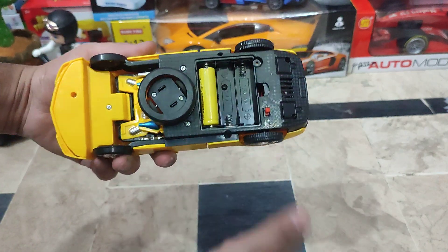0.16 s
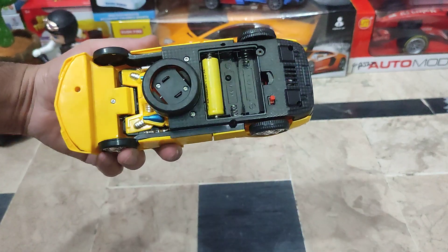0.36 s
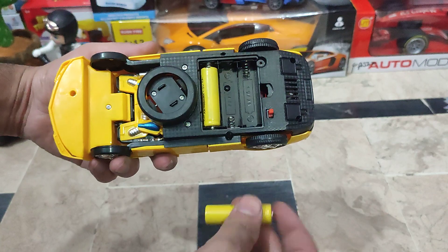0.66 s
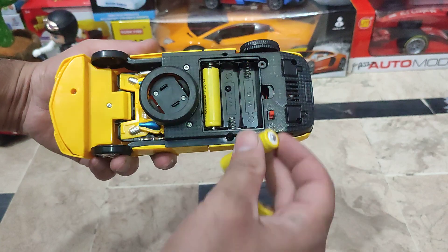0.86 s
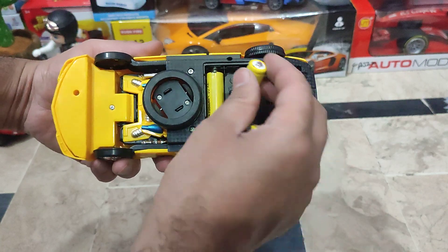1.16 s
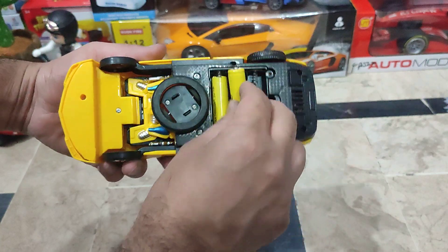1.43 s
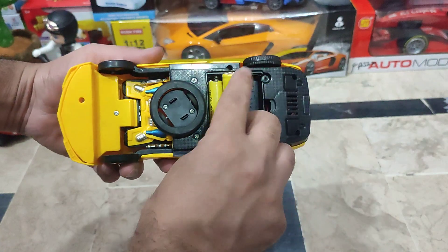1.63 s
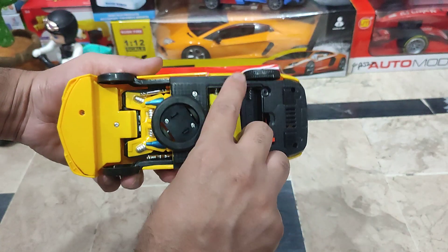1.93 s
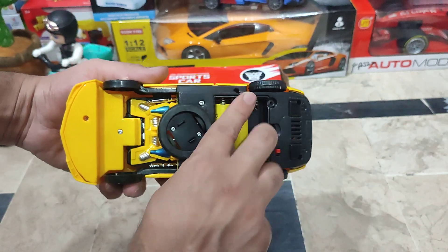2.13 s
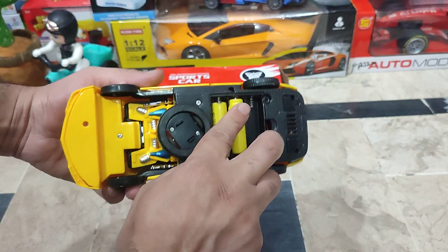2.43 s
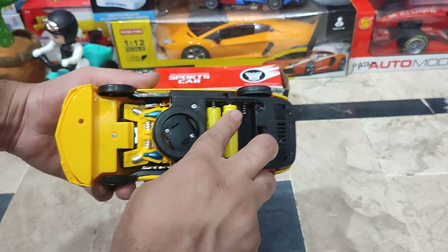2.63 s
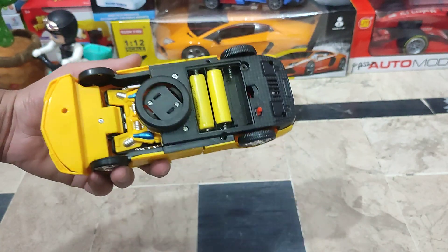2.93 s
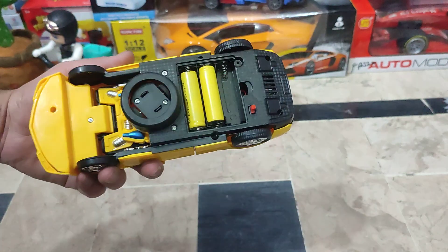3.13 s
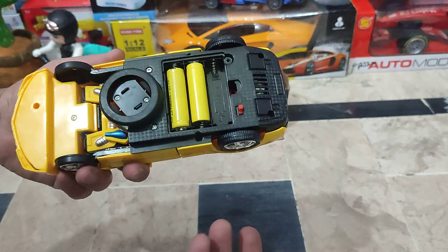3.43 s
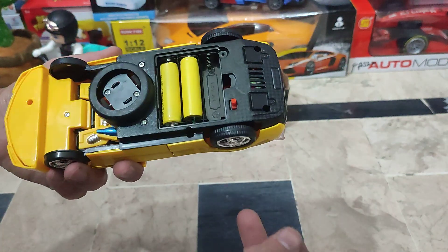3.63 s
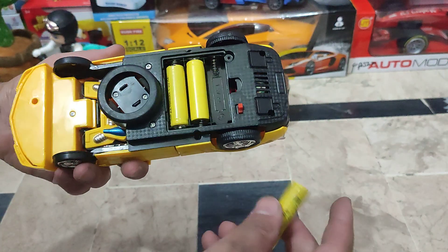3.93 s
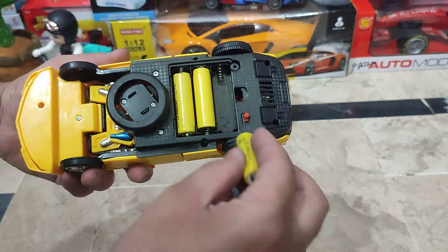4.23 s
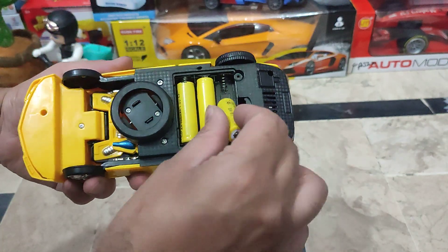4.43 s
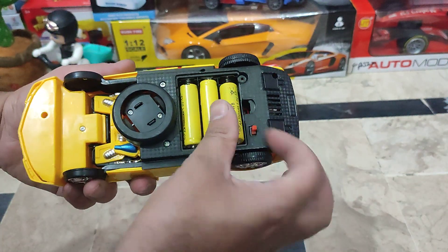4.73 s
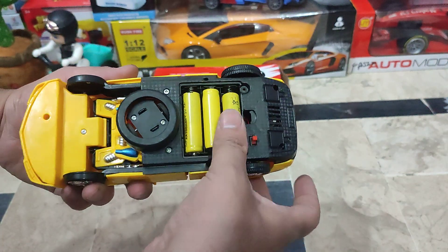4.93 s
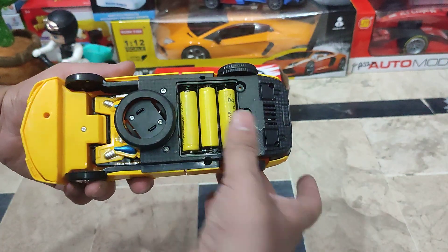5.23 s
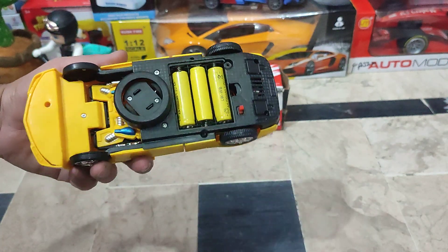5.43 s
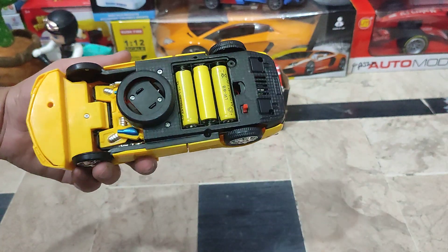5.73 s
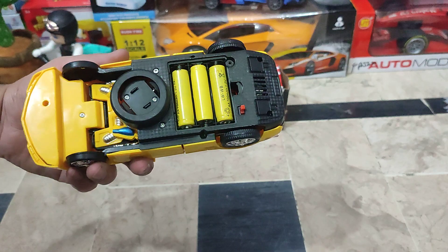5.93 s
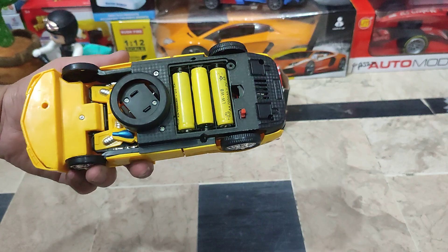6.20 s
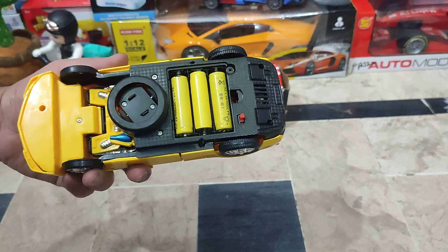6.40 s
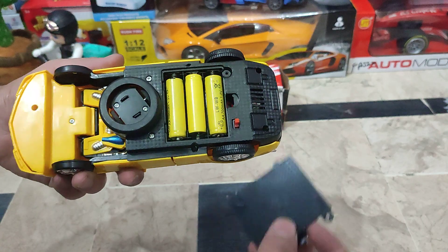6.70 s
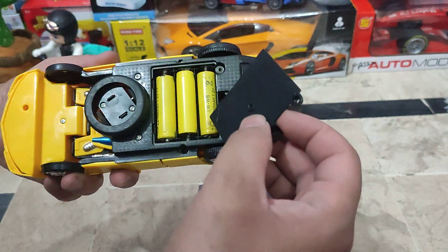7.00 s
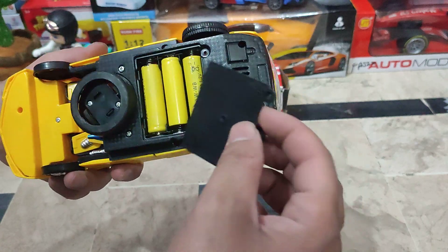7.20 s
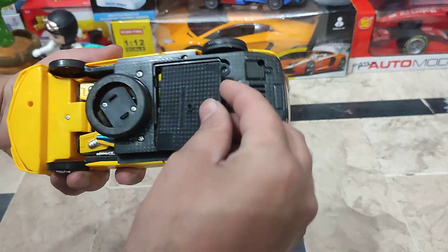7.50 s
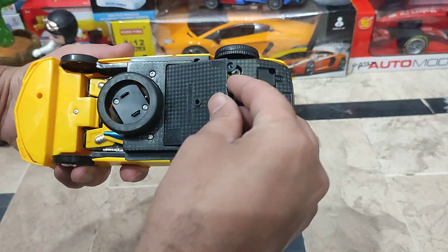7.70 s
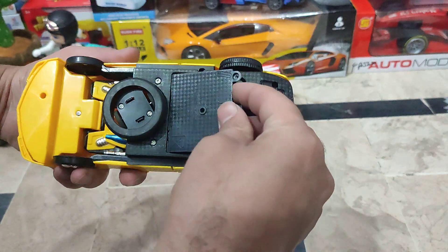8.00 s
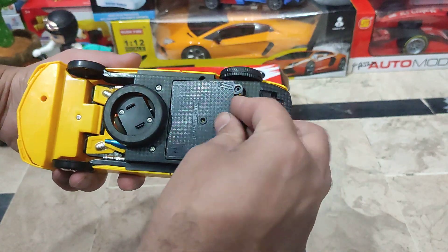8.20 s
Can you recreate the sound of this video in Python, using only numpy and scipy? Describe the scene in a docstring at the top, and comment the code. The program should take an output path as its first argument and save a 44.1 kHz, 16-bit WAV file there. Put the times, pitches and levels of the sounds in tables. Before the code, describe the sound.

Batteries clack and snap into a hollow plastic toy car, with spring rings and scrapes, then a cover slides on in a hard, echoing room.

```python
"""In a hard, stone-floored room, a hand holds a hollow plastic toy car upside down close to the microphone.
Two batteries are knocked into the compartment, pressed against their springs and snapped home;
then the plastic cover is picked up, laid on and slid into place.
Contacts are decaying shell modes plus noise-like clacks and ticks; springs, chassis and hollow ring
as clusters of sines; rubbing is grainy shaped noise. Dense echoes and a quiet room tone lie behind."""
import sys
import numpy as np
from scipy import signal
from scipy.fft import rfft, irfft
from scipy.io import wavfile
from scipy.ndimage import uniform_filter1d, minimum_filter1d

SR = 44100
rng = np.random.default_rng(int(sys.argv[2]) if len(sys.argv) > 2 else 0)


def wav_record(signal):
    """Record a signal, one row per channel, as 16-bit PCM in the file named by sys.argv[1]."""
    frames = np.transpose(np.atleast_2d(signal))
    bounded = np.clip(frames, -1, 1)
    # unit amplitude maps onto the largest positive 16-bit level
    quanta = np.round(bounded * 32767).astype(np.int16)
    wavfile.write(sys.argv[1], SR, quanta)


N = 368235

# Room tone: (frequency [Hz], relative level [dB per Hz])
ROOM_TONE = [(10, -12.5), (25, -9), (40, -10), (62, -6.5), (85, -12.5), (130, -10), (190, -18),
             (270, -22.5), (410, -19.5), (700, -26.5), (2700, -35.5), (6500, -42.5), (9700, -49),
             (15000, -42.5)]
# Left-right likeness of the room tone: (frequency [Hz], correlation [-1 to 1])
ROOM_TONE_LIKENESS = [(30, 1), (120, 0.2), (300, 0.25), (700, .6), (1500, 0.067), (4000, .05),
                      (16000, 0.033)]
# Echo decay of the room: (frequency [Hz], 60 dB decay time [s])
ECHO_DECAY = [(200, 1.0), (700, 0.75), (1400, 0.62), (3000, 0.8), (6000, 0.65), (9000, 0.56), (15000, 0.42)]
# Tone colour of the echo: (frequency [Hz], level before the send trim [dB])
ECHO_COLOUR = [(200, -6), (600, -5), (1300, -3), (2500, -2.5), (5000, -5.5), (7500, -4.5), (9000, -3.5),
               (15000, -4)]
# The microphone is jostled and rumbles faintly: (start [s], length [s], level [dB])
JOSTLE_STROKES = [(.35, 0.14, -55), (6.63, 0.22, -50.5), (7.2, .18, -54.5)]
# Colour of the rumble: (frequency [Hz], relative level [dB per Hz])
JOSTLE_COLOUR = [(14, 1), (35, -13), (80, -32), (300, -73)]
# Fingertips slide over plastic: (start [s], length [s], level [dB])
FINGER_STROKES = [(.41, .06, -72), (2.59, 0.034, -63), (2.83, .16, -77), (3.14, 0.099, -76.5),
                  (5.56, 0.17, -74), (5.92, .22, -65.5), (6.19, 0.086, -60.5), (6.52, 0.11, -70)]
# Colour of skin on plastic: (frequency [Hz], relative level [dB per Hz])
FINGER_COLOUR = [(1000, 5), (2500, 4.5), (4000, 2.5), (7000, 3), (9500, -6.5), (12500, 1), (16000, -6)]
# The gripping hand squeaks on the glossy body: (start [s], length [s], level [dB])
SQUEAK_STROKES = [(5.927, .03, -57), (5.99, .07, -66)]
# Colour of the squeak: (frequency [Hz], relative level [dB per Hz])
SQUEAK_COLOUR = [(2500, -49.5), (3550, -14), (3720, 0.5), (3870, 0), (4100, -13), (4800, -19.5),
                 (5010, -12.5), (5300, -26), (7000, -47.5)]
# A battery or the cover drags along the shell: (start [s], length [s], level [dB])
SCRAPE_STROKES = [(1.32, 0.045, -49), (4.6, 0.063, -44), (4.96, 0.14, -58), (7.43, 0.098, -56.5),
                  (7.53, 0.073, -59), (7.6, .11, -50.5), (7.72, .3, -64), (8.14, .16, -61.5),
                  (8.315, .06, -55)]
# Colour of the scrape: (frequency [Hz], relative level [dB per Hz])
SCRAPE_COLOUR = [(300, -12.5), (700, -7.5), (1100, 0), (1600, -3), (2400, -3.5), (4500, -12.5),
                 (7200, -11.5), (8500, -29), (15000, -33)]
# The hollow under the compartment: (centre [Hz], width [Hz], relative level [dB], 60 dB decay time [s])
HOLLOW_CLUSTERS = [(380, 420, 0, .28)]
# A battery lands over the hollow, which booms: (time [s], level before the ring trim [dB])
HOLLOW_LANDINGS = [(4.3, -56), (4.543, -43.5), (5.048, -49)]
# Mode clusters of the chassis: (centre [Hz], width [Hz], relative level [dB], 60 dB decay time [s])
CHASSIS_CLUSTERS = [(1440, 240, 0, .45), (1720, 350, -5.5, .3), (3540, 170, -12, .75),
                    (5135, 600, -16, .55), (6130, 400, -16.5, .55)]
# A battery rams or snaps into its seat: (time [s], level before the ring trim [dB])
CHASSIS_HITS = [(2.194, -39), (4.583, -35), (5.048, -22.5)]
# Mode clusters of the contact springs: (centre [Hz], width [Hz], relative level [dB], 60 dB decay time [s])
SPRING_CLUSTERS = [(1100, 550, 0, .55), (2450, 900, -7, .65), (6700, 2400, 0, .42)]
# Batteries and cover brush the springs: (time [s], level before the ring trim [dB])
SPRING_BRUSHES = [(1.368, -46), (2.194, -47), (4.3, -42.5), (7.504, -57)]
# Modes of the hollow shell, damped by the hand: (frequency [Hz], relative level [dB], 60 dB decay time [s])
SHELL_MODES = [(330, -23.5, 0.059), (496, -22, .035), (714, -16, 0.09), (886, -5.5, 0.064), (1018, -3, .04),
               (1132, -2.5, 0.024), (1264, -0.5, 0.024), (1432, -3, 0.024), (1599, -0.5, 0.019),
               (1704, -2.5, 0.022), (1863, -9.5, 0.064), (2095, -5, 0.035)]
# Crowded upper modes of the plastic: (frequency [Hz], relative level [dB per Hz])
CLACK_COLOUR = [(200, -17), (700, -9), (1500, -10.5), (2100, 1), (2500, 2), (2900, -0.5), (3400, -0.5),
                (4300, -4.5), (5100, -1.5), (5600, -5), (6200, -2.5), (7400, -5), (8600, -17), (12000, -39)]
# Sharp tick of the edges: (frequency [Hz], relative level [dB per Hz])
TICK_COLOUR = [(3000, -28), (6000, -13), (7800, 1), (9500, -6), (11000, -3.5), (13000, -3), (15000, -0.5),
               (17000, -5.5)]
# A battery or the cover chatters as it settles: (start [s], length [s], middling level before the trims [dB])
RATTLE_RUNS = [(1.322, .068, -31), (1.471, .014, -31.5), (4.34, .03, -41), (4.6, .02, -30),
               (7.612, .022, -45), (8.255, .055, -54)]
# Batteries and cover strike the shell, all levels before the trims:
# (time [s], knock level [dB], clack over knock [dB], tick over knock [dB])
SHELL_CONTACTS = [(-0.025, -30, -5.5, -13.5), (1.3023, -34.5, -10, -28), (1.3136, -25, 0.5, -9),
                  (1.3409, -26.5, -6.5, -18.5), (1.3673, -19, 0, -17), (1.4681, -29, -9.5, -24),
                  (1.554, -36.5, -20, -23), (1.611, -36, -12, -20), (1.8937, -45.5, -2.5, -5),
                  (1.8969, -24.5, -9.5, -21.5), (1.987, -39.5, -10, -23), (2.0213, -39, -17, -31),
                  (2.108, -30.5, -9, -16), (2.13, -37.5, -4.5, -26), (2.194, -16, -7.5, -9.5),
                  (2.43, -51, 3, 7), (2.486, -46.5, -4.5, -18), (2.586, -51.5, -3.5, -21),
                  (2.682, -45, -7.5, -17.5), (2.745, -48.5, -14, -24.5), (4.294, -36, -6.5, -23),
                  (4.2995, -28, -3.5, -10), (4.542, -18, -4.5, -14.5), (4.583, -20, 1, -14.5),
                  (4.5975, -23, -1, -11), (4.644, -31, -3.5, -20), (4.783, -45, 9.5, 2),
                  (4.9527, -34.5, -6, -16), (5.0427, -30.5, -12.5, -14.5), (5.047, -9.5, -5, -9),
                  (5.05, -10.5, -1, -11.5), (6.217, -56.5, 5, -8.5), (6.273, -46, 14.5, 6),
                  (6.316, -50, 12, -1), (6.342, -42, -0.5, -4), (7.413, -51, 3.5, -5.5),
                  (7.445, -56, 6.5, -6), (7.504, -31.5, -4, -13.5), (7.641, -40, 2.5, -3),
                  (7.662, -33.5, -6, -27), (7.748, -47, -5, -24), (8.141, -54, -4.5, -18.5),
                  (8.212, -49.5, -8, -9), (8.305, -45, -6, -19), (8.319, -43.5, -11, -19)]

ROOM_TONE_DB = -62
CUTOFF_HZ = 15400
LEAD = int(.1 * SR)   # samples of run-up, cut off before the output
TOTAL = N + LEAD
SMALL_BODY = signal.butter(2, 420, "high", fs=SR, output="sos")   # the knock carries little below about 420 Hz
RING_TRIM_DB = -2
RATTLE_GAP_S, RATTLE_SCATTER_DB = .01, 2
RATTLE_CLACK_DB, RATTLE_TICK_DB = -6, -15   # over the knock, before the trims
# harder and sharper blows speak higher: centre of a middling knock, its rise with strength and with clack
KNOCK_HZ, MIDDLING_DB = 1260, -36
RISE_OCTAVES_PER_DB, CLACK_OCTAVES_PER_DB = .0115, .012
LEVEL_SAMPLES = 265   # contact levels are set over the first 6 ms


def from_db(db):
    """Decibels to gain."""
    return 10 ** (np.asarray(db) / 20)


def rms_one(x, count=None):
    """Scale so that the first count samples (or all) have rms 1."""
    return x / np.sqrt(np.mean(x[..., :count] ** 2) + 1e-20)


def at_hz(points, hz):
    """Read a table on a log-frequency axis."""
    f, value = np.transpose(points)
    return np.interp(np.log(np.maximum(hz, 1)), np.log(f), value)


def dying(t, t60):
    """Exponential decay that falls 60 dB in t60 seconds."""
    return from_db(-60 * t / np.maximum(t60, .001))


def rising(t, rise_s):
    """Soft onset that approaches 1 with time constant rise_s."""
    return 1 - np.exp(-t / rise_s)


def silence():
    """An empty stereo track, run-up included."""
    return np.zeros((2, TOTAL))


def add(track, s, sound):
    """Mix a stereo sound into the track at time s."""
    start = LEAD + int(round(s * SR))
    part = sound[:, :TOTAL - start]
    track[:, start:start + part.shape[1]] += part


def noise(spectrum, size, likeness):
    """Stereo noise with a spectrum and a left-right correlation (a number or a table); rms 1."""
    hz = np.fft.rfftfreq(size, 1 / SR)
    alike = np.clip(likeness if np.isscalar(likeness) else at_hz(likeness, hz), -1, 1)
    mid, side = rfft(rng.standard_normal((2, size)))
    pair = np.sqrt(1 + alike) * mid + np.sqrt(1 - alike) * side * [[1], [-1]]
    return rms_one(irfft(pair * from_db(at_hz(spectrum, hz)), size))


def room_tone():
    """The quiet room is steady noise, more alike between the ears in the lowest bass."""
    return from_db(ROOM_TONE_DB) * noise(ROOM_TONE, N, ROOM_TONE_LIKENESS)


def room(x, first_echo_s=.001, build_s=.005):
    """Dense reflections from bare walls and floor, dying at their own rate in each overlapping band."""
    t, hz = np.arange(SR) / SR, np.fft.rfftfreq(SR, 1 / SR)
    reflections = rfft(rng.standard_normal((2, SR))) * from_db(at_hz(ECHO_COLOUR, hz))
    centres, t60s = np.transpose(ECHO_DECAY)
    onset = rising(np.maximum(t - first_echo_s, 0), build_s)
    echo = 0
    for share, t60 in zip(np.eye(len(centres)), t60s):
        fade = onset * dying(t, t60)
        band = irfft(reflections * np.interp(hz, centres, share), SR)
        echo = echo + band * fade / np.sqrt(np.sum(fade ** 2))
    return signal.fftconvolve(x, echo, axes=1)[:, :TOTAL]


def friction(strokes, spectrum, grain_db, grain_s):
    """Shaped noise swells and fades in each stroke; a grain_db above 0 adds the tiny catches and slips of sliding."""
    out = silence()
    for s, length, db in strokes:
        t = np.arange(int(length * SR)) / SR
        knots = np.arange(0, length + grain_s, grain_s)
        grains = from_db(grain_db * np.interp(t, knots, rng.standard_normal(len(knots))))
        swell = np.sqrt(np.abs(np.sin(np.pi * t / length)))
        rub = noise(spectrum, len(t), likeness=.27) * grains * swell
        add(out, s, from_db(db) * rms_one(rub))
    return out


def jostles():
    """Handling of the microphone makes low rumbling noise that swells and fades once in each stroke."""
    return friction(JOSTLE_STROKES, JOSTLE_COLOUR, grain_db=0, grain_s=.05)   # no grain


def fingers():
    """Skin on plastic hisses in grains; on the glossy body the grip squeaks in narrow bands."""
    slides = friction(FINGER_STROKES, FINGER_COLOUR, grain_db=3, grain_s=.003)
    return slides + friction(SQUEAK_STROKES, SQUEAK_COLOUR, grain_db=.5, grain_s=.0048)


def scrapes():
    """A dragged battery or cover catches roughly along the shell."""
    return friction(SCRAPE_STROKES, SCRAPE_COLOUR, grain_db=7, grain_s=.002)


def thump(s=5.048, db=-33, hz=36, t60=.16, pan_db=7, hand_hz=150, hand_db=-7):
    """The last battery snapping home jolts the whole car in the hand and pushes a puff of air."""
    out, t = silence(), np.arange(SR // 2) / SR
    puff = np.sin(2 * np.pi * hz * t) * dying(t, t60)
    jolt = from_db(hand_db) * np.sin(2 * np.pi * hand_hz * t) * dying(t, .04)
    add(out, s, -from_db(db + np.array([[pan_db], [-pan_db]])) * (puff + jolt))
    return out


def rings(clusters, blows, ear_turns):
    """A struck part rings on in clusters of modes, strongest at their centres, out of step between the ears."""
    out, t = silence(), np.arange(int(.7 * SR)) / SR
    place = np.linspace(-.5, .5, num=19)[:, None]   # across the width of a cluster
    ring = 0
    for hz, width, db, t60 in clusters:
        modes = hz + width * (place + rng.normal(0, .02, place.shape))
        strength = np.exp(-(2 * place) ** 2 * 2)
        phase = rng.random(place.shape) + ear_turns * rng.standard_normal((2, len(modes), 1))   # in turns
        twang = np.sum(strength * np.sin(2 * np.pi * (modes * t + phase)), axis=1)
        ring = ring + from_db(db) * rms_one(twang) * rising(t, .003) * dying(t, t60)
    for s, db in blows:
        add(out, s, from_db(RING_TRIM_DB + db) * ring)
    return out


def hollow():
    """The hollow under the compartment booms in one broad low cluster."""
    return rings(HOLLOW_CLUSTERS, HOLLOW_LANDINGS, ear_turns=.07)


def chassis():
    """The chassis rings on as a battery rams or snaps into its seat."""
    return rings(CHASSIS_CLUSTERS, CHASSIS_HITS, ear_turns=.2)


def springs():
    """Brushed contact springs ring on in wide clusters."""
    return rings(SPRING_CLUSTERS, SPRING_BRUSHES, ear_turns=.25)


def knock(t, centre_hz, reach_octaves=.39, scatter_db=2.0, phase_scatter=.96):
    """The shell's modes start together; where it is struck decides which of them speak most."""
    hz, db, t60 = np.transpose(SHELL_MODES)[:, :, None]
    favour = 1 / (1 + (np.log2(hz / centre_hz) / reach_octaves) ** 2)
    strength = from_db(db + scatter_db * rng.standard_normal(hz.shape)) * favour
    # each mode radiates from its own part of the shell and reaches each microphone with its own phase
    between_ears = .5 * rng.standard_normal((2, len(hz), 1))
    phase = phase_scatter * rng.standard_normal(hz.shape) + between_ears
    modes = strength * dying(t, t60) * np.sin(2 * np.pi * hz * t + phase)
    motion = rising(t, .0006) * np.sum(modes, axis=1)
    return signal.sosfilt(SMALL_BODY, motion)


def burst(t, spectrum, t60, likeness):
    """Crowded, equally strong modes merge into a short, even burst that dies away; rms 1 over the first 6 ms."""
    fade = rising(t, .0003) * dying(t, t60)
    shared, own = rng.standard_normal(len(t)), rng.standard_normal((2, len(t)))
    alike = np.clip(likeness, 0, 1)
    modes = rfft((np.sqrt(alike) * shared + np.sqrt(1 - alike) * own) * fade)
    even = modes / np.abs(modes)   # equal strength, phases kept
    colour = from_db(at_hz(spectrum, np.fft.rfftfreq(len(t), 1 / SR)))
    gate = rising(t, .0001) * dying(t, 4 * t60)
    return rms_one(irfft(colour * even, len(t)) * gate, LEVEL_SAMPLES)


def contact(t, db, clack_over, tick_over, knock_db=-4.0, clack_db=-3, tick_db=-2.5,
            clack_t60=.03, tick_t60=.02, pan_db=-.5, pan_scatter_db=1.0):
    """One contact is a hollow knock, a clack of the upper modes and a sharp tick of the edges."""
    rise = RISE_OCTAVES_PER_DB * (db - MIDDLING_DB) + CLACK_OCTAVES_PER_DB * clack_over
    body = from_db(knock_db) * rms_one(knock(t, KNOCK_HZ * 2 ** rise), LEVEL_SAMPLES)
    clack = from_db(clack_db + clack_over) * burst(t, CLACK_COLOUR, clack_t60, likeness=.45)
    tick = from_db(tick_db + tick_over) * burst(t, TICK_COLOUR, tick_t60, likeness=.5)
    pan = rng.normal(pan_db, pan_scatter_db)   # left over right
    return (body + clack + tick) * from_db(db + np.array([[pan], [-pan]]) / 2)


def rattles():
    """A settling part makes a quick, uneven run of light contacts."""
    out, t = silence(), np.arange(4096) / SR
    for s, length, db in RATTLE_RUNS:
        gaps = RATTLE_GAP_S * rng.uniform(.5, 1.5, size=10)
        for delay in np.cumsum(gaps) - gaps[0]:
            touch = contact(t, rng.normal(db, RATTLE_SCATTER_DB), RATTLE_CLACK_DB, RATTLE_TICK_DB)
            if delay < length:
                add(out, s + delay, touch)
    return out


def contacts():
    """Batteries and cover strike the shell, each blow with its own hardness and sharpness."""
    out, t = silence(), np.arange(4096) / SR
    for s, db, clack_over, tick_over in SHELL_CONTACTS:
        add(out, s, contact(t, db, clack_over, tick_over))
    return out


def right_later(x, count):
    """The car is slightly nearer the left microphone: the right one hears it count samples later."""
    return np.stack([x[0], np.roll(x[1], count)])


def scene():
    """The quiet room, the car's sounds and their echo."""
    tone = room_tone()
    ringing = hollow() + chassis() + springs()
    car = fingers() + scrapes() + rattles() + contacts()
    near = jostles() + thump() + ringing + right_later(car, count=4)
    echo = from_db(-1) * room(car + from_db(-9.5) * ringing)
    balance = from_db(.4 * np.array([[1], [-1]]))   # a touch to the left
    return tone + balance * (near + echo)[:, LEAD:]


def record(dry, hold_s=.083):
    """A limiter ducks what exceeds its ceiling and holds briefly; peaks are rounded and the top is cut."""
    ceiling_db = -9.5
    power = uniform_filter1d(np.mean(dry ** 2, axis=0), size=130)   # over 3 ms
    level_db = 10 * np.log10(np.maximum(power, 1e-12))
    hold = int(hold_s * SR) // 2 * 2 + 1
    # the shifted window looks back, so each duck lasts for the hold
    duck_db = minimum_filter1d(np.minimum(ceiling_db - level_db, 0), hold, origin=hold // 2)
    limited = np.tanh(dry * from_db(uniform_filter1d(duck_db, size=200)))
    top_cut = signal.ellip(10, .2, 80, CUTOFF_HZ, fs=SR, output="sos")
    return signal.sosfilt(top_cut, limited)


dry = scene()
out = record(dry)
wav_record(out)
```